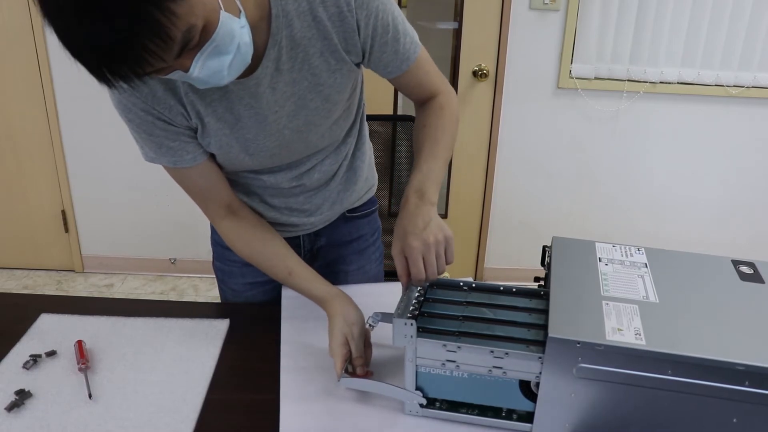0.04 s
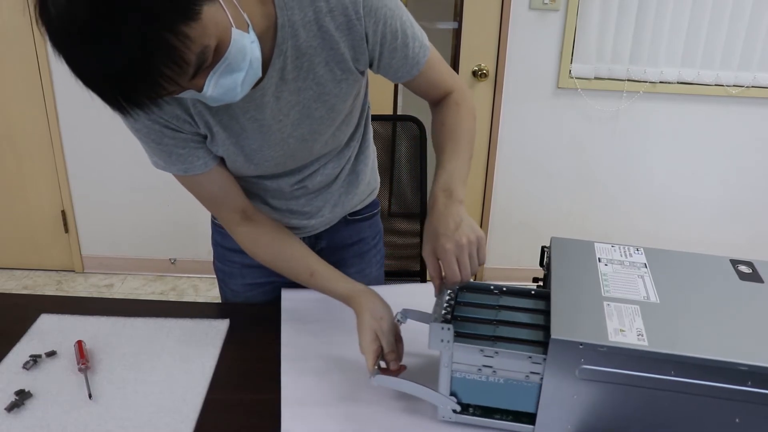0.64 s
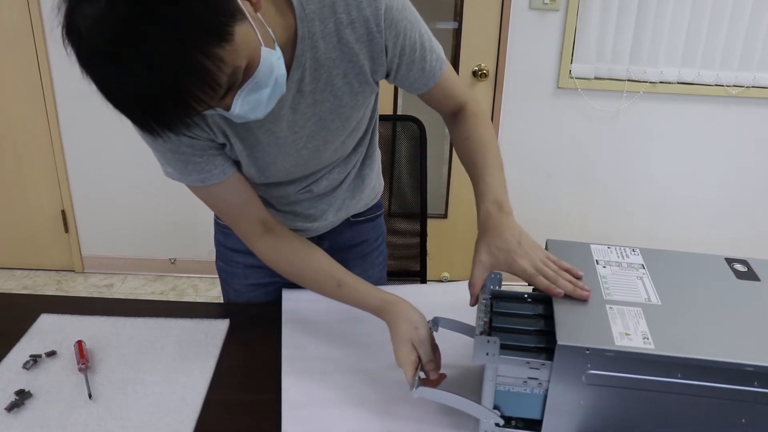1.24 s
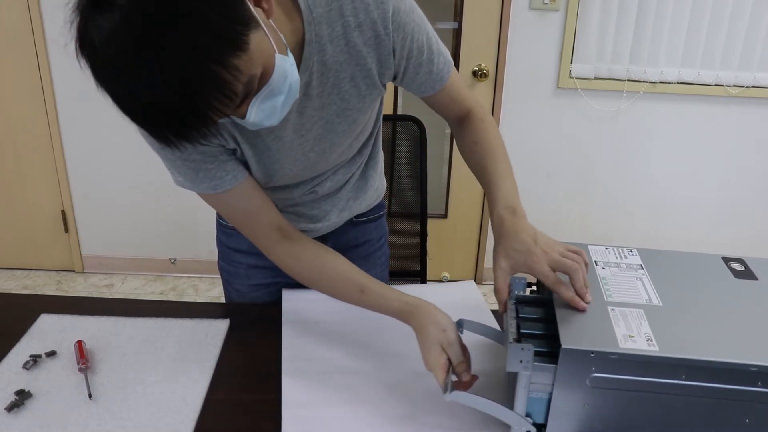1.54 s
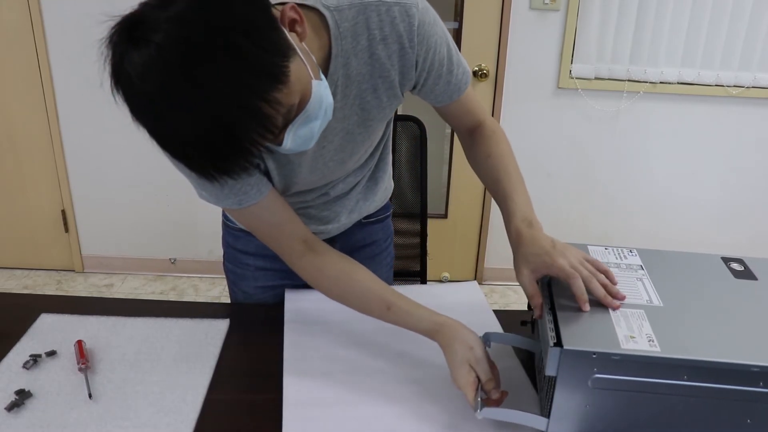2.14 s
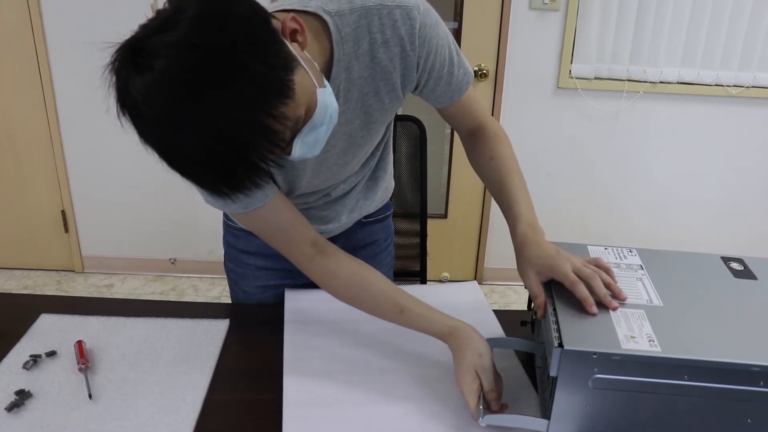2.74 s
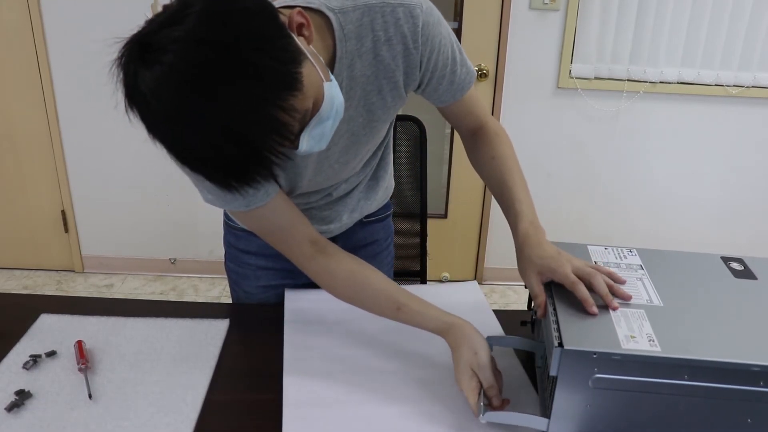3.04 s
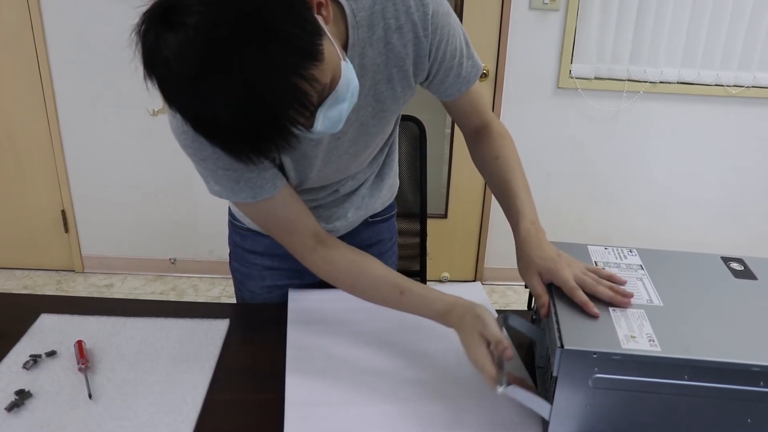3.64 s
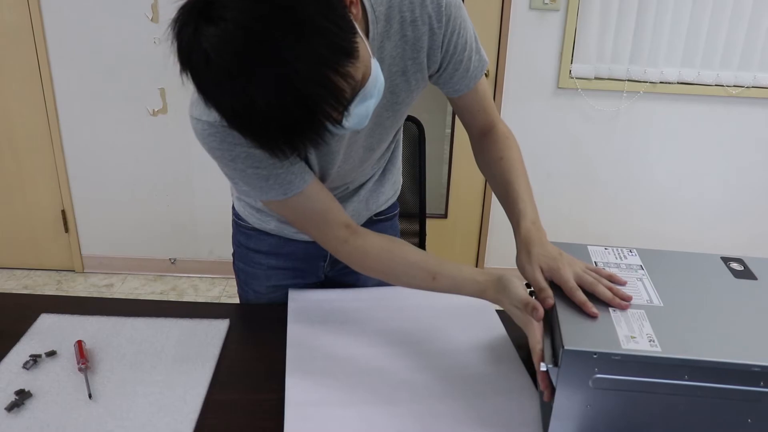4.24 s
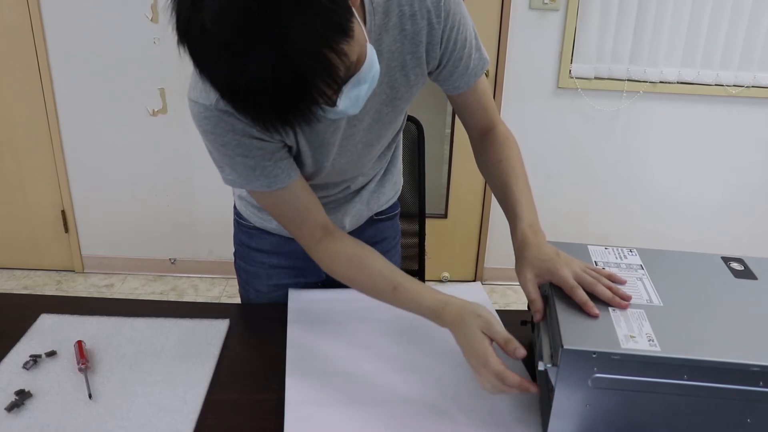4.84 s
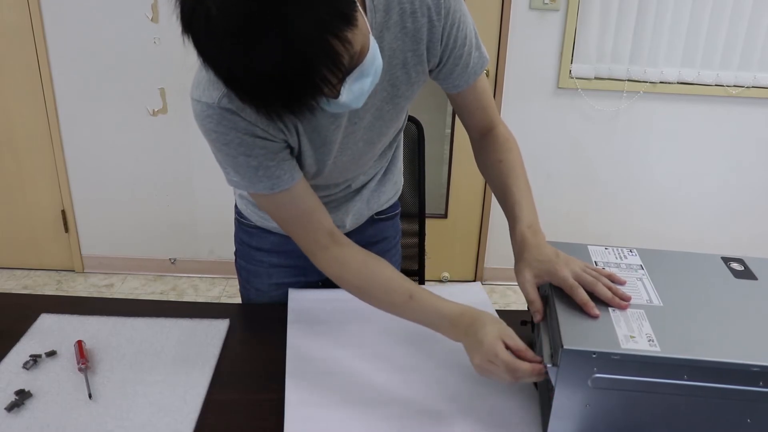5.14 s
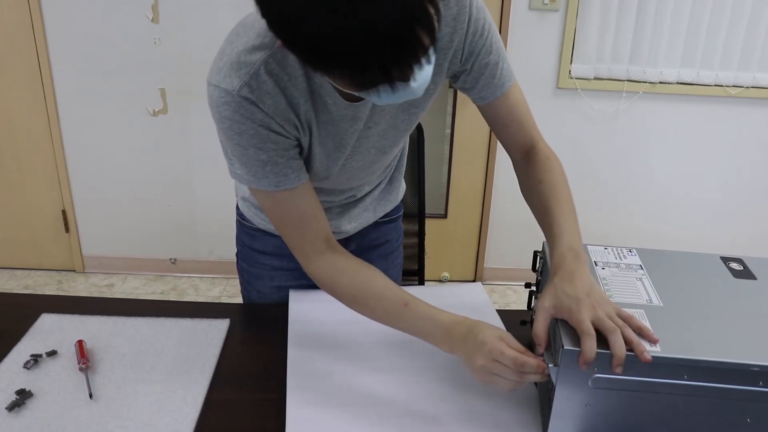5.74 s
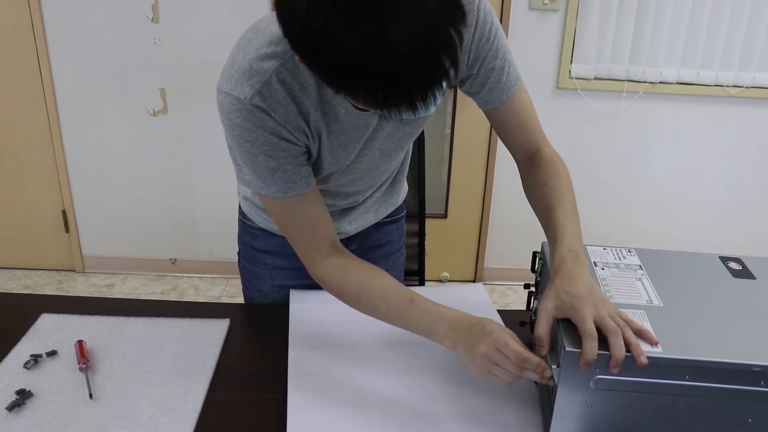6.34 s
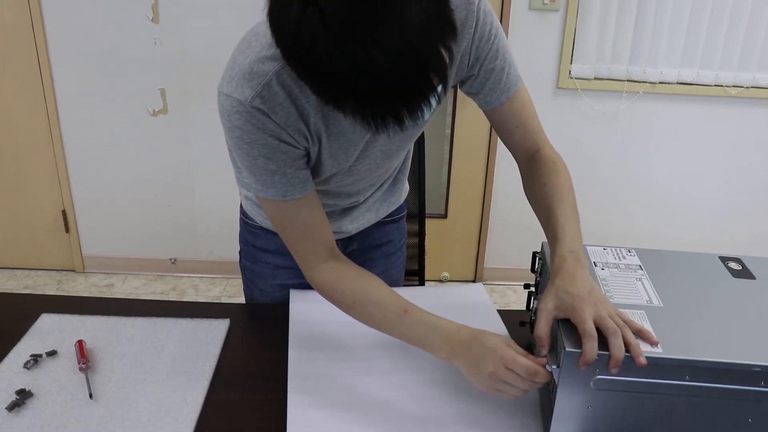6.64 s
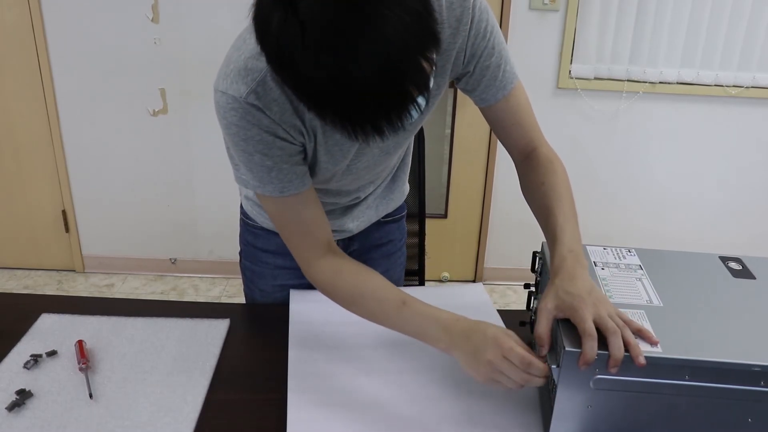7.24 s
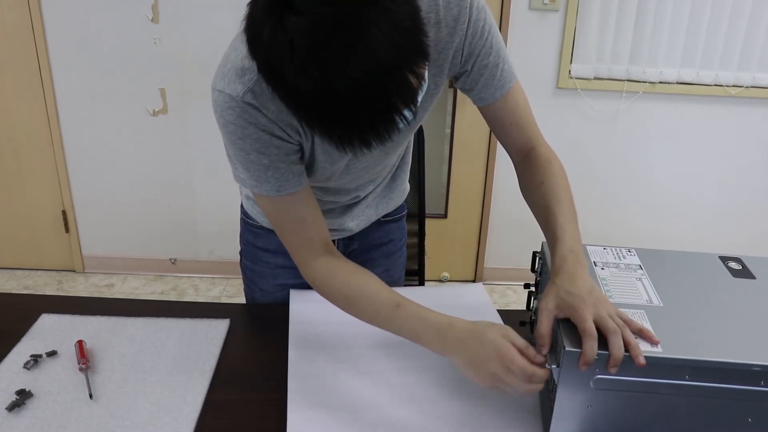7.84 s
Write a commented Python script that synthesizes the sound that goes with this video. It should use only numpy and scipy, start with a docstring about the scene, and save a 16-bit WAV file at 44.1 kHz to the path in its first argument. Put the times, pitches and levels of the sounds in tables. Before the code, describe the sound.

Metal scrapes along rails and thuds to a stop, followed by soft hand bumps, clicking levers and a bright latch snap in a humming room.

```python
"""A small hard-walled office, its ventilation humming low. On a table, a heavy steel drawer grinds
along its rails into a rack chassis and bumps home with a boom that sets the lid ringing.
Loose handles tap, two sprung levers rub in their pivots and click shut, a hand skids and pats over
the lid, and a bright spring latch snaps in. Table and case murmur under the weight of the hands,
and the room answers each blow."""
import sys
import numpy as np
from scipy import signal
from scipy.fft import rfft, irfft, next_fast_len
from scipy.io import wavfile
from scipy.ndimage import map_coordinates

SR = 44100
rng = np.random.default_rng(int(sys.argv[2]) if len(sys.argv) > 2 else 0)


def transcribe(signal):
    """Save signal, clipped to [-1, 1], as a 16-bit WAV file at the path in sys.argv[1]."""
    frames = np.atleast_2d(signal).T
    limited = np.clip(frames, -1, 1)
    pcm = np.round(limited * 32767).astype(np.int16)
    wavfile.write(sys.argv[1], SR, pcm)


N = 347949
HIT, ATTACK = int(.45 * SR), int(.03 * SR)  # samples in a whole blow and in its front edge

# the office's reverb tail: (frequency [Hz], t60 [s])
ROOM_DECAY = [(100, 0.19), (500, 0.46), (1500, 0.31), (4000, 0.36), (8000, 0.39), (12000, 0.34),
              (16000, 0.065)]
# tone of the moving air: (frequency [Hz], level [dB])
AIR_COLOUR = [(15, 10), (32, -1), (48, 5), (75, -19.5), (100, -0.5), (130, -6), (170, -9), (230, -8.5),
              (340, -16.5), (430, -19.5), (600, -31), (1050, -28.5), (2000, -33.5), (6000, -39),
              (15800, -43.5)]
# narrow duct drones riding on the air: (centre [Hz], width [Hz], level [dB])
DUCT_DRONES = [(114.7, 20, 1.5), (405, 36, -3), (600, 33, -1.5), (734, 10, -7), (800, 12, -4)]
# how hard the hands bear down: (time [s], effort [dB])
EFFORT = [(0, -52.5), (.4, -46.5), (.86, -44.5), (1.3, -47.5), (1.6, -49.5), (2.1, -50.5), (2.6, -43),
          (2.95, -54), (4.0, -48.5), (4.9, -47.5), (5.3, -54), (5.6, -43.5), (5.98, -46), (6.2, -62.5),
          (6.53, -46), (7.25, -57), (7.48, -49.5), (7.89, -64.5)]
# tone of the table and of the hollow case: (frequency [Hz], level [dB])
TABLE_COLOUR = [(20, -45.5), (50, -34.5), (85, 0), (120, 10.5), (165, -2.5), (240, -6.5), (330, -38),
                (900, -66.5), (3000, -110)]
CASE_COLOUR = [(60, -45.5), (220, -13), (330, -4.5), (430, 2.5), (530, -10.5), (660, -8), (850, -30),
               (1500, -40.5), (4000, -100)]

# three pushes, most of the way in, up to the stop, and home; each a list of (time [s], speed [dB])
PUSHES = [
    [(.03, -22), (.42, -17.5), (.55, -8), (.65, -0.5), (.78, -1.5), (.86, -8.5), (1.03, -10.5),
     (1.15, -18.5)],
    [(1.15, -19), (1.35, -12), (1.43, -7.5), (1.58, -8.5), (1.68, -9.5), (1.81, -2), (1.9, -5),
     (2.04, -8.5), (2.15, -23)],
    [(2.2, -17), (2.37, -13.5), (2.5, -13.5), (2.75, -60)],
]
# the rails' grind, scrape and hiss: (level [dB], growth with speed [dB/dB], drift [dB/s])
RAIL_LAYERS = [(-40.5, 1.13, 1.5), (-40, 1.54, -1.5), (-45.5, 1.0, -3.5)]
# rubbing strokes: (start [s], length [s], level [dB])
RUNNER_BINDS = [(.425, .03, 12.5), (.505, 0.036, 8.5), (.69, 0.022, 2), (.99, 0.077, 8.5),
                (1.515, 0.029, 7.5), (1.61, .03, 5.5)]  # a boost to the grind and scrape
FLANK_RASPS = [(.52, 0.029, -56), (1.42, 0.23, -58.5)]  # drawer against chassis wall
PIN_CREAKS = [(2.21, .03, -73), (2.47, 0.16, -71.5), (2.7, 0.084, -74)]
FINGER_DRAGS = [(2.7, 0.095, -59.5), (3.0, 0.24, -61), (3.55, 0.39, -64), (4.02, 0.21, -54.5),
                (4.45, .35, -65), (4.91, 0.017, -49.5), (5.28, 0.4, -61), (6.3, 0.14, -63),
                (6.93, 0.16, -66.5), (7.45, 0.24, -69)]
PIVOT_RUBS = [(3.02, .17, -72), (3.73, 0.046, -57.5), (4.094, 0.078, -43), (4.71, 0.045, -57),
              (5.09, 0.061, -51.5), (5.3, 0.33, -67)]
PALM_BRUSHES = [(5.7, 0.12, -64), (5.9, 0.045, -73)]
# skin sticks and slips on the lid: (time [s], slip rate [1/s], level [dB])
SKID = [(5.298, 203, -100), (5.313, 240, -38), (5.355, 243, -34), (5.385, 190, -37), (5.41, 208, -43),
        (5.435, 170, -42), (5.5, 230, -100)]

# panels that light nudges set off: (pitch [Hz], level [dB], nudge rate [1/s])
PANELS = [(126, -43.5, 3.0), (237, -49.5, 1.2), (413, -42, 2.8)]
# heavier bumps of hands and case on the table: (time [s], level [dB], pitch [Hz], swell [s])
THUMPS = [(.15, -34.5, 152, .011), (.625, -30, 220, 0.0071), (.685, -27.5, 400, 0.0041),
          (.735, -26, 212, 0.0058), (2.065, -19.5, 251, 0.018), (2.242, -26.5, 122, 0.0043),
          (2.383, -20, 213, 0.003), (2.408, -18, 208, 0.0028), (2.422, -26, 486, 0.0078),
          (2.508, -17, 144, 0.0068), (2.538, -25, 266, 0.0024), (2.603, -18.5, 410, 0.0012),
          (3.465, -34.5, 248.6, 0.018), (3.591, -35, 389, 0.006), (3.64, -37, 400, 0.0086),
          (3.743, -36, 284, 0.021), (3.98, -35.5, 419, 0.014), (4.058, -23, 233, 0.0068),
          (4.06, -41, 760, 0.0047), (4.955, -31, 436, 0.00081), (4.982, -19, 130, 0.0047),
          (5.442, -25.5, 118, .02), (5.63, -28, 147, 0.011), (5.643, -24.5, 360, 0.0032),
          (5.69, -22.5, 120.4, 0.022), (5.746, -28.5, 130, 0.014), (6.513, -29.5, 220, 0.0068),
          (6.622, -31, 112, 0.015), (7.092, -41, 426, .012), (7.468, -27.5, 125.3, 0.015)]
# the drawer hits rails and chassis: (time [s], boom [dB], panel [dB], clank [dB], edge [dB], t60 [s])
KNOCKS = [(0.439, -36, -41, -49, -81, 0.25), (0.864, -26, -27.5, -25, -33, 0.31),
          (1.397, -55, -41.5, -62, -60, 0.35), (1.529, -53, -42, -45, -54, 0.066),
          (1.732, -72, -36.5, -42, -39, 0.13), (1.944, -40, -29, -42, -79, 0.12),
          (1.977, -41, -23, -39, -86, 0.19), (2.061, -15.5, -16, -24, -34.5, 0.22),
          (2.348, -25, -20.5, -26.5, -39, 0.2), (3.719, -34.5, -38.5, -52.5, -59, 0.44)]
# the lid's lingering modes: (pitch [Hz], level against the boom [dB], t60 [s])
LID_MODES = [(251, -0.5, 0.28), (690, -14.5, 0.44), (721, -9, 0.43)]
# handles nudge their stops: (time [s], body [dB], tilt towards the treble [dB/band])
HANDLE_TAPS = [(3.363, -57, -11), (3.792, -47, -7.5), (6.968, -50, -14.5), (7.026, -56.5, -17),
               (7.505, -58.5, -14)]
# the levers catch and close:
# (time [s], body [dB], clack [dB], ring [dB], sparkle [dB], contact [s], lower lever's share [0-1])
LEVER_CLICKS = [(4.119, -54, -70, -48.5, -43.5, 0.0032, 0.1),
                (4.3412, -36.5, -32.5, -37.5, -53.5, 0.0061, 0.02),
                (4.44, -73, -47, -49.5, -71.5, 0.0058, 0.04), (4.694, -78, -54, -68, -73, 0.022, 0),
                (4.749, -64, -58, -47, -58.5, 0.014, 0.6), (4.7602, -40, -31.5, -30, -40, 0.018, 0.78),
                (4.807, -43, -50, -51, -55, 0.0037, 0.8), (5.05, -63, -50, -50.5, -66, 0.04, 0),
                (5.133, -68, -46, -50, -53, 0.071, 0.45), (5.1417, -58, -41.5, -35.5, -49, 0.015, 0.2)]
# the latch ticks, snaps and rebounds:
# (time [s], body [dB], clack [dB], ring [dB], sparkle [dB], contact [s])
LATCH_CLICKS = [(6.3917, -71, -47.5, -54, -63.5, 0.012), (6.4968, -43, -32.5, -35, -46, 0.0081),
                (6.514, -41, -40, -46, -55.5, 0.01), (6.598, -36.5, -30, -25, -26, 0.0032),
                (6.632, -41.5, -43, -34, -43, 0.013)]
# edges of the four bands of a blow: (frequency [Hz])
KNOCK_EDGES = [80, 330, 1000, 3500, 14000]  # boom, panel, clank, edge
CLICK_EDGES = [300, 1400, 4600, 9000, 15500]  # body, clack, ring, sparkle

# broad tone of each contact: (frequency [Hz], level [dB])
RAIL_COLOUR = [(88, -25.5), (150, 5), (221, -10.5), (306, -19.5), (409, -5), (701, -22.5), (818, -12),
               (1110, -15.5), (1840, -9), (2650, -26), (3150, -29.5), (8100, -37), (15000, -58.5)]
KNOCK_COLOUR = [(60, -2.5), (180, 16.5), (330, 7), (500, 9.5), (700, 5.5), (900, -4.5), (2500, -18.5),
                (4500, -24.5), (8000, -31), (11000, -46), (15000, -47)]
FINGER_COLOUR = [(250, -10), (500, -1), (900, 1), (1450, -2), (2000, -11.5), (3000, -14), (8000, -43.5)]
PIVOT_COLOUR = [(400, 11), (1400, -1), (2300, 11), (3300, 5), (5500, -2.5), (8000, -1), (11500, -15),
                (13000, -33), (15500, -42)]
LEVER_COLOUR = [(200, 0), (500, 5), (1600, -3), (4300, -0.5), (7800, -5), (9500, -22), (11500, -17.5),
                (12600, -36), (15500, -38.5)]
SKID_COLOUR = [(100, -5.5), (220, 2.5), (320, 1), (470, 8.5), (700, -8), (850, -36.5), (1100, -14),
               (1350, -29.5), (4000, -60.5)]
PALM_COLOUR = [(3000, -14), (6500, -14), (8300, 1), (9800, -16), (14000, -24)]
LATCH_COLOUR = [(200, -21.5), (650, -12.5), (1000, -9.5), (1350, -5.5), (1650, -0.5), (4000, 3), (8000, 1),
                (10000, 3.5), (12500, 2.5), (14000, -1), (15500, -5)]
# resonances of the steel parts: (centre [Hz], width [Hz], prominence [dB])
RAIL_MODES = [(414, 28, -9), (820, 110, -5), (1360, 390, -3.5), (2010, 164, -31), (2570, 650, 5),
              (8200, 790, -25)]
CHASSIS_MODES = [(189, 19, -2), (247, 17, 8), (634, 50, -6), (994, 30, -3), (1300, 99, 1), (1560, 55, -20),
                 (1870, 400, -4), (2370, 66, 2), (2610, 67, 6)]
HANDLE_MODES = [(727, 26, -9), (890, 48, -3), (1114, 36, -23), (1804, 120, 5), (4000, 160, -5),
                (5670, 330, -36)]
UPPER_LEVER_MODES = [(427, 68, -7), (1020, 130, 2.5), (1645, 40, -10), (2540, 74, 9), (3330, 20, -8.5),
                     (3800, 22, -25), (4210, 70, 3), (5940, 20, -27), (6900, 14, -9.5), (7400, 180, -12)]
LOWER_LEVER_MODES = [(1060, 43, 7.5), (1580, 94, 27.5), (2560, 90, -5), (2970, 160, -5), (4010, 83, 10),
                     (5120, 49, -1), (7650, 18, -20.5), (7800, 95, -4), (9700, 78, -4), (12300, 24, -21)]
LATCH_MODES = [(700, 50, 0.5), (1155, 31, -2.5), (1690, 110, 6), (1880, 100, 0.5), (2655, 980, 5),
               (3730, 300, -1.5), (3810, 100, -4), (4120, 130, 3), (5350, 130, -15.5), (5800, 270, -3.5),
               (6820, 300, -3.5), (8000, 250, 1), (8330, 140, -5), (8030, 120, 5), (9800, 100, -4),
               (12100, 840, -5.5)]


def amp(db):
    """Decibels to gain."""
    return 10 ** (np.asarray(db) / 20)


def unit(x):
    """x at rms 1."""
    return x / np.sqrt(np.mean(x ** 2) + 1e-20)


def along(points, hz):
    """(frequency [Hz], value) points read on a log axis."""
    knots_hz, values = np.transpose(points)
    return np.interp(np.log(hz + 1), np.log(knots_hz + 1), values)


def curves(rows):
    """An automation curve for each column after the time."""
    times, *columns = np.transpose(rows)
    return [np.interp(np.arange(N) / SR, times, column) for column in columns]


def wobble(rate):
    """A smooth random curve, rate knots a second."""
    return map_coordinates(rng.standard_normal(int(N * rate / SR) + 4), [np.arange(N) * rate / SR])


def fade(t, t60):
    """Exponential decay by 60 dB in t60."""
    return np.exp(-np.log(1000) * t / t60)


def add(track, s, sound):
    """Lay a sound into a track at s seconds."""
    start = round(s * SR)
    track[start:start + len(sound)] += sound[:N - start]


def band(x, lo_hz, hi_hz):
    """The part of x between two frequencies."""
    return signal.sosfilt(signal.butter(4, [lo_hz, hi_hz], "band", fs=SR, output="sos"), x)


def coloured(x, gain):
    """x through the minimum-phase EQ whose magnitude is gain(hz)."""
    size = 2 * next_fast_len(len(x) // 2 + 4096)
    cepstrum = irfft(np.log(np.maximum(gain(np.fft.rfftfreq(size, 1 / SR)), 1e-6)))
    cepstrum[1:size // 2] *= 2
    cepstrum[size // 2 + 1:] = 0
    return irfft(rfft(x, size) * np.exp(rfft(cepstrum)))[:len(x)]


def tone(colour):
    """EQ curve of a colour table."""
    return lambda hz: amp(along(colour, hz))


def metal(colour, modes, lift_db):
    """EQ curve of a steel part: a broad colour with resonances standing out of it."""
    def gain(hz):
        peaks = sum(amp(db / 2) / (1 + (2 * (hz - centre) / width) ** 2) for centre, width, db in modes)
        return tone(colour)(hz) * (1 + amp(lift_db) * peaks)
    return gain


def reverb(build_s):
    """The office's tail, of energy 1: it builds up, then dies at its own speed at each frequency."""
    hz, t, noise = signal.stft(rng.standard_normal(HIT), SR, nperseg=256)
    envelope = fade(t, along(ROOM_DECAY, hz)[:, None]) * (1 - np.exp(-t / build_s))
    tail = signal.istft(noise * envelope, SR, nperseg=256)[1][:HIT]
    return tail / np.linalg.norm(tail)


def in_room(x, wet_db):
    """x plus its reverb."""
    return x + amp(wet_db) * signal.fftconvolve(x, reverb(build_s=0.0053))[:len(x)]


def blow(part, edges, levels_db, contact_s, ring_db, t60, wet_db):
    """Steel chatters on steel, dense modes ring, the room answers; levels_db sets each band's attack."""
    t = np.arange(HIT) / SR
    flutter = amp(3 * np.repeat(rng.standard_normal(HIT), 20)[:HIT])
    chatter = unit(rng.standard_normal(HIT) * np.exp(-(t / contact_s) ** 4) * flutter)
    ring = unit(rng.standard_normal(HIT) * fade(t, t60))
    sound = coloured(chatter + amp(ring_db) * ring + amp(wet_db) * unit(reverb(build_s=0.007)), part)
    bands = [band(sound, lo, hi) for lo, hi in zip(edges, edges[1:])]
    return sum(amp(db) * b / np.std(b[:ATTACK]) for b, db in zip(bands, levels_db))


def friction(grains_per_s, grain_db):
    """Rubbing texture: a fine hiss with separate catches of the rough surfaces."""
    catches = (rng.random(N) < grains_per_s / SR) * rng.standard_normal(N)
    return unit(rng.standard_normal(N) + amp(grain_db) * unit(catches))


def patchy(x, depth_db, width_hz, life_s):
    """x with resonances that come and go: a random gain over frequency and time."""
    spectrum = signal.stft(x, nperseg=512)[2]
    rows = np.arange(spectrum.shape[0]) * SR / 512 / width_hz
    columns = np.arange(spectrum.shape[1]) * 256 / SR / life_s
    grid = np.meshgrid(rows, columns, indexing="ij")
    patches = map_coordinates(rng.standard_normal((300, 500)), grid, order=1, mode="mirror")
    return signal.istft(spectrum * amp(depth_db * unit(patches)), nperseg=512)[1][:len(x)]


def strokes(rows, attack_s, t60):
    """Envelope of rubbing strokes: each swells, holds and dies away."""
    t = np.arange(N) / SR
    return sum(amp(db) * np.clip((t - s) / attack_s, 0, 1) ** 2 * fade(np.maximum(t - s - length, 0), t60)
               for s, length, db in rows)


def effort_db(s):
    """How far the effort stands above an easy touch at s seconds."""
    easy_db = -52
    return np.interp(s, *np.transpose(EFFORT)) - easy_db


def stirred(db, grows):
    """Envelope that rides the effort, rising by grows dB for each dB of it."""
    return amp(db + grows * effort_db(np.arange(N) / SR))


def ventilation():
    """The bed: rumbling air with narrow duct drones, and a faint wavering hum."""
    def ducts(hz):
        drones = sum(amp(db) / (1 + (2 * (hz - centre) / width) ** 2) for centre, width, db in DUCT_DRONES)
        return tone(AIR_COLOUR)(hz) * (1 + drones)
    air = unit(coloured(rng.standard_normal(N), ducts))
    hum_hz = 120
    hum = np.sin(2 * np.pi * hum_hz * np.arange(N) / SR + .7 * wobble(10)) * amp(4 * wobble(8))
    return amp(-48.5) * air + amp(-65) * hum


def leaning():
    """The table and the hollow case murmur in small lumps as hands bear down on them."""
    def murmur(colour):
        lumps = rng.standard_normal(N) * amp(7.4 * np.tanh(.9 * wobble(26)))
        return unit(coloured(lumps, tone(colour)))
    return stirred(-51, grows=0.98) * murmur(TABLE_COLOUR) + stirred(-58, grows=0.46) * murmur(CASE_COLOUR)


def slide():
    """The rails grind louder with speed; as the contact point moves, resonances speak in turn."""
    t = np.arange(N) / SR
    speed_db = np.max([np.interp(t, *np.transpose(push), left=-90, right=-90) for push in PUSHES], axis=0)
    grit = patchy(friction(grains_per_s=140, grain_db=-7.5), depth_db=2.1, width_hz=220, life_s=.055)
    rub = coloured(grit, metal(RAIL_COLOUR, RAIL_MODES, lift_db=4.5))
    edges_hz = [200, 1000, 3500, 15000]
    grind, scrape, hiss = (amp(db + grows * speed_db + drift * t) * unit(band(rub, lo, hi))
                           for (db, grows, drift), lo, hi in zip(RAIL_LAYERS, edges_hz, edges_hz[1:]))
    binding = np.maximum(1, strokes(RUNNER_BINDS, attack_s=.02, t60=.25))
    rasp = strokes(FLANK_RASPS, attack_s=0.036, t60=0.14) * unit(band(grit, lo_hz=3170, hi_hz=5400))
    judder = amp(-4.5 + 3.1 * wobble(39.76))
    return in_room(judder * (binding * (grind + scrape) + hiss + rasp), wet_db=-9.5)


def nudges():
    """Light chance contacts, firmer under more effort, as rows like those of THUMPS."""
    scatter_db, detune, swell_cycles = 2, .05, 2.5
    rows = []
    for hz, db, per_s in PANELS:
        slots = np.arange(0, N / SR, 1 / per_s)
        for slot, (late, size, bend) in zip(slots, rng.uniform(-1, 1, (64, 3))):
            s = slot + (1 + late) / 2 / per_s
            level_db = db + 0.45 * effort_db(s) + scatter_db * size
            rows.append((s, level_db, hz * (1 + detune * bend), swell_cycles / hz))
    return [row for row in rows if row[0] < (N - 1) / SR]


def thumps():
    """Soft contacts swell and die within a few cycles of a panel, with a dull rustle of nearby modes."""
    track, t = np.zeros(N), np.arange(HIT // 2) / SR
    size = next_fast_len(len(t), True)
    bins_hz = np.fft.rfftfreq(size, 1 / SR)
    for s, db, hz, swell_s in list(THUMPS) + nudges():
        envelope = (t / swell_s) ** 2 * np.exp(2 * (1 - t / swell_s))
        nearby = 1 / (1 + (np.log((bins_hz + 1) / (1.25 * hz)) / .5) ** 4)
        rustle = unit(irfft(rfft(rng.standard_normal(size)) * nearby)[:len(t)])
        add(track, s, amp(db - 2) * envelope * (np.sin(2 * np.pi * hz * t) + amp(-16) * rustle))
    return in_room(track, wet_db=-9.5)


def knocks():
    """The drawer jolts over rail joints and lands against the back of the chassis, whose lid rings on."""
    track, t = np.zeros(N), np.arange(HIT) / SR
    chassis = metal(KNOCK_COLOUR, CHASSIS_MODES, lift_db=4.5)
    for s, *levels_db, t60 in KNOCKS:
        lid = sum(amp(levels_db[0] + db) * np.sin(2 * np.pi * hz * t) * fade(t, lid_t60)
                  for hz, db, lid_t60 in LID_MODES)
        impact = blow(chassis, KNOCK_EDGES, levels_db, contact_s=0.012, ring_db=9, t60=t60, wet_db=-5)
        add(track, s, lid + impact)
    return amp(-8.5) * track


def pins():
    """Sprung contacts at the back tick faintly on one high resonance as the drawer is pressed home."""
    centre_hz, width_hz = 5950, 350
    resonance = lambda hz: 1 / np.hypot(1, 2 * (hz - centre_hz) / width_hz)
    ticks = unit(coloured(friction(grains_per_s=57, grain_db=16), resonance))
    return strokes(PIN_CREAKS, attack_s=.01, t60=.1) * ticks


def fingers():
    """Dry skin drags softly over painted steel, and creeps a little under any effort."""
    drag = unit(coloured(friction(grains_per_s=310, grain_db=-3.5), tone(FINGER_COLOUR)))
    motion = np.hypot(strokes(FINGER_DRAGS, attack_s=0.027, t60=0.16), stirred(-69, grows=.6))
    return in_room(motion * amp(-4 + 1.2 * wobble(30)) * drag, wet_db=-8.5)


def pivots():
    """The levers rub grainily in their pivots as they are pressed in."""
    pivot = metal(PIVOT_COLOUR, UPPER_LEVER_MODES, lift_db=-1)
    rub = unit(coloured(friction(grains_per_s=480, grain_db=-5), pivot))
    return in_room(amp(-1.5) * strokes(PIVOT_RUBS, attack_s=0.023, t60=0.055) * rub, wet_db=-13)


def handles():
    """Loose handles rock gently against their stops and ring briefly."""
    track, handle = np.zeros(N), metal(KNOCK_COLOUR, HANDLE_MODES, lift_db=16.5)
    for s, db, tilt_db in HANDLE_TAPS:
        levels_db = db + tilt_db * np.arange(len(CLICK_EDGES) - 1)
        add(track, s, blow(handle, CLICK_EDGES, levels_db, contact_s=0.12, ring_db=30, t60=0.2, wet_db=0))
    return track


def levers():
    """Sprung levers scrape past their catches and click shut; a blow on one also shakes the other."""
    track = np.zeros(N)
    upper = metal(LEVER_COLOUR, UPPER_LEVER_MODES, lift_db=5)
    lower = metal(LEVER_COLOUR, LOWER_LEVER_MODES, lift_db=7.5)
    for s, *levels_db, contact_s, share in LEVER_CLICKS:
        both = lambda hz: (1 - share) * upper(hz) + share * lower(hz)
        add(track, s, blow(both, CLICK_EDGES, levels_db, contact_s, ring_db=-2.5, t60=0.13, wet_db=-7.5))
    return track


def hand():
    """A hand skids on the lid in a buzz of sticking and slipping, then brushes lightly across it."""
    rate, db = curves(SKID)
    slip_count = np.floor(np.cumsum(rate * (1 + 0.038 * wobble(150))) / SR)
    slips = np.diff(slip_count, prepend=0) * amp(0.58 * wobble(120))
    buzz = unit(coloured(slips, tone(SKID_COLOUR)))
    rub = unit(coloured(rng.standard_normal(N), tone(SKID_COLOUR)))
    skid = amp(db - 1.5) * (buzz + amp(-1.5) * rub)
    swish = unit(coloured(rng.standard_normal(N), tone(PALM_COLOUR)))
    brush = amp(4) * strokes(PALM_BRUSHES, attack_s=0.055, t60=.35) * swish
    return in_room(skid + brush, wet_db=-12.5)


def latch():
    """A stiff spring latch snaps, short and bright."""
    track, spring = np.zeros(N), metal(LATCH_COLOUR, LATCH_MODES, lift_db=3)
    for s, *levels_db, contact_s in LATCH_CLICKS:
        add(track, s, blow(spring, CLICK_EDGES, levels_db, contact_s, ring_db=-5, t60=.11, wet_db=-4))
    return track


def scene():
    """The mono mix, heard from across the table: steel, soft contacts and the ventilation bed."""
    steel = knocks() + levers() + latch() + handles() + slide() + pivots() + pins()
    return (steel + thumps() + hand() + fingers() + leaning() + ventilation())[None]


def record(dry):
    """Master EQ: ease off the deepest rumble and cut the very top."""
    top_hz = 15950
    size = next_fast_len(N + SR // 2)
    hz = np.fft.rfftfreq(size, 1 / SR)
    low_shelf = np.interp(hz, [30, 45], [.55, 1])
    return irfft(rfft(dry, size) * low_shelf * (hz < top_hz), size)[:, :N]


dry = scene()
out = record(dry)
transcribe(out)
```